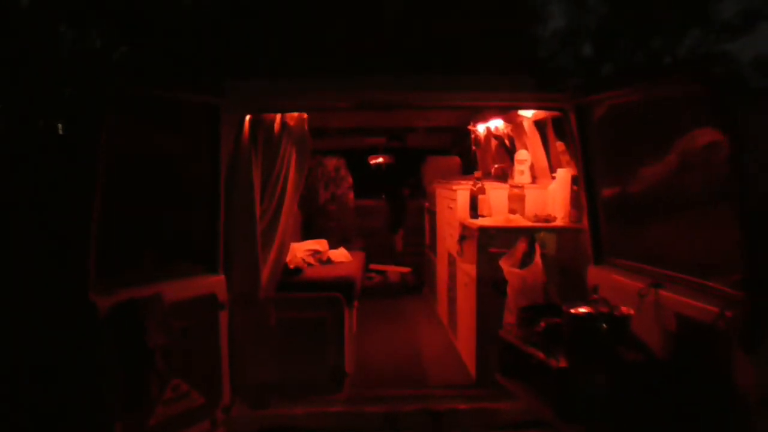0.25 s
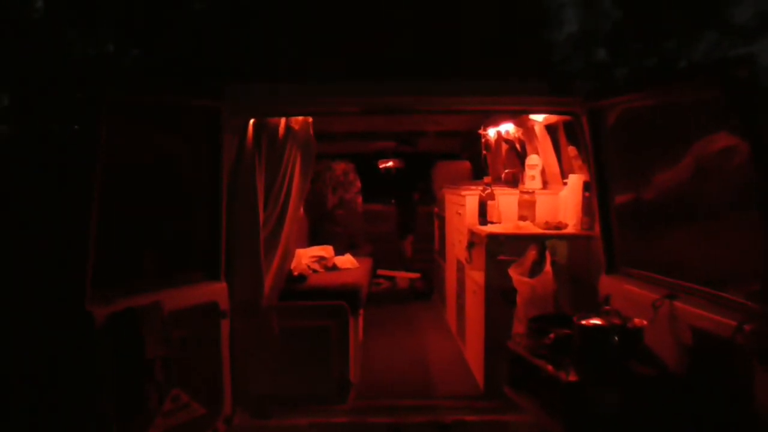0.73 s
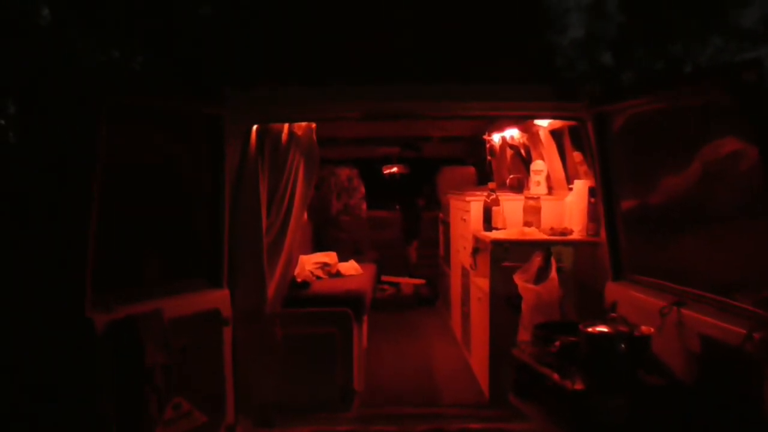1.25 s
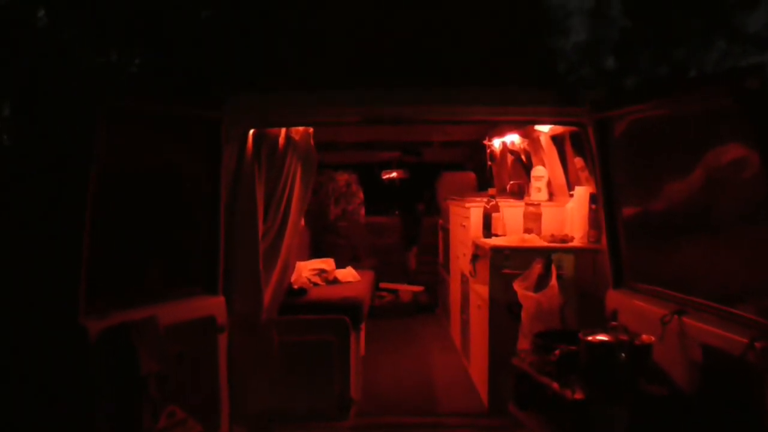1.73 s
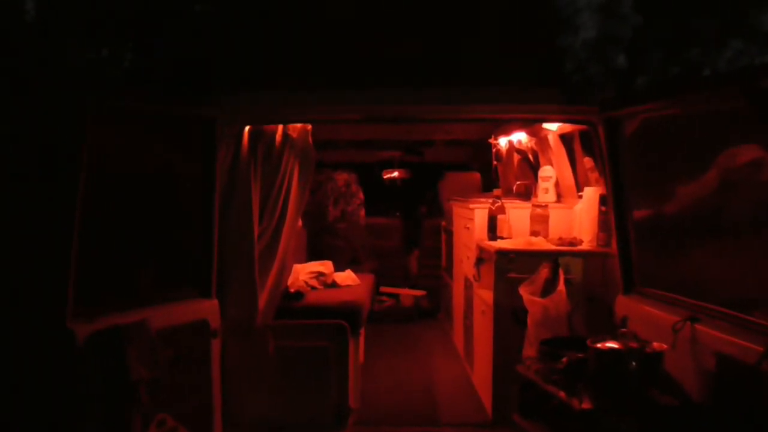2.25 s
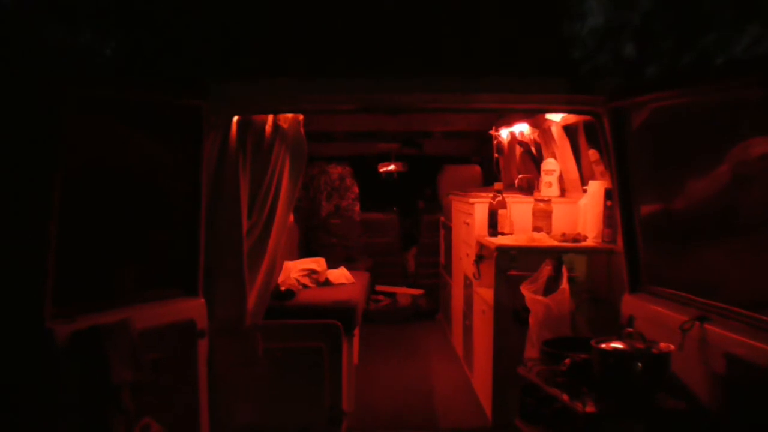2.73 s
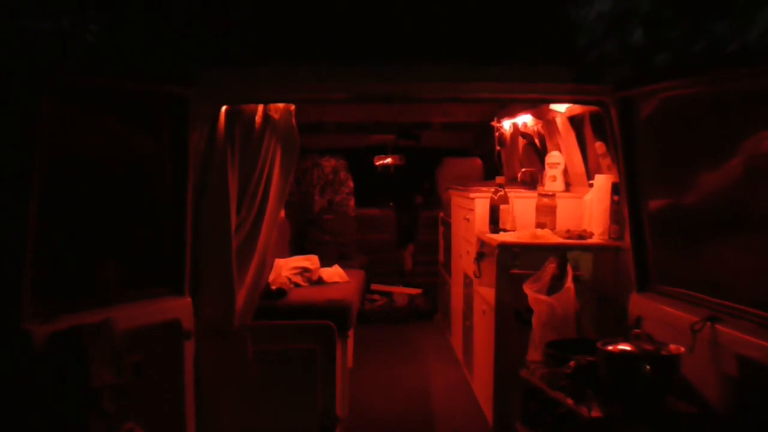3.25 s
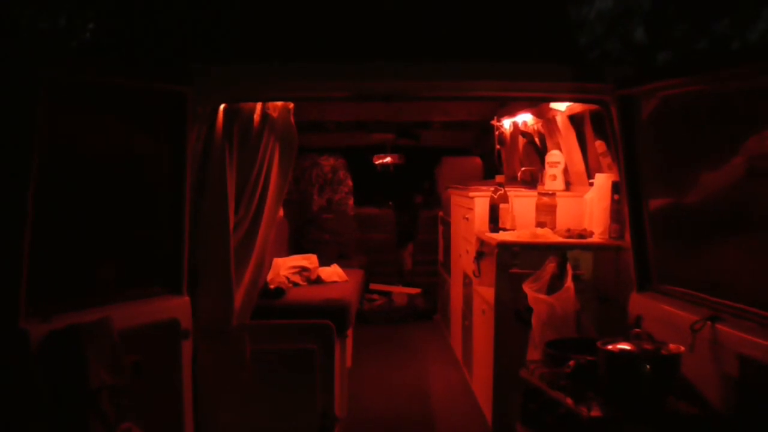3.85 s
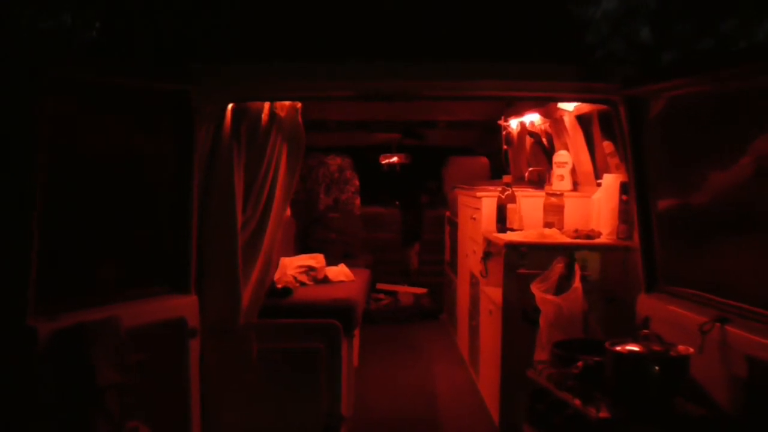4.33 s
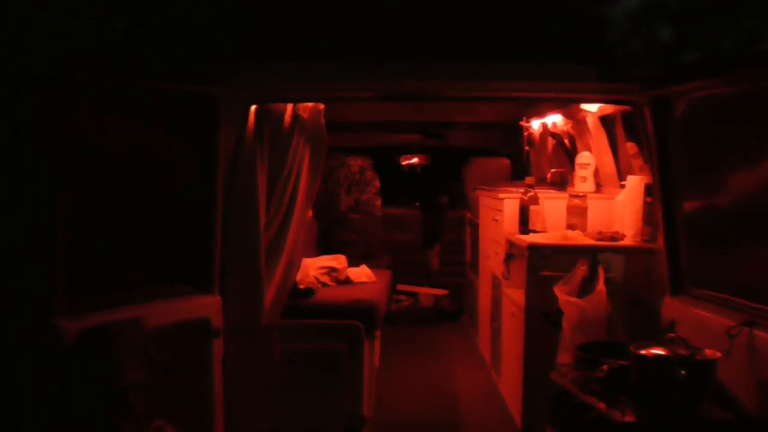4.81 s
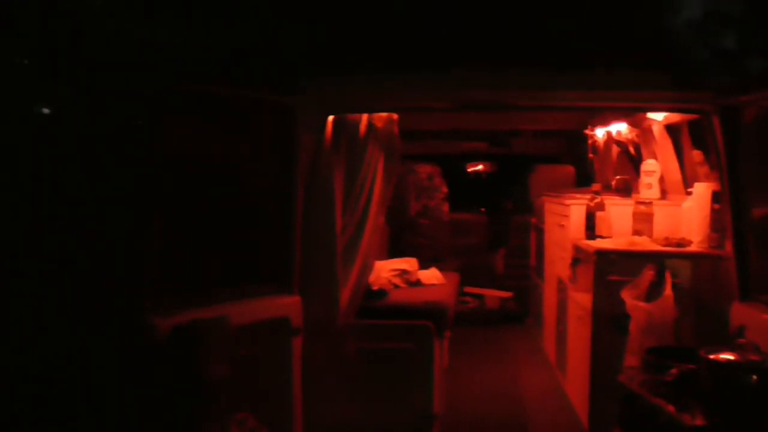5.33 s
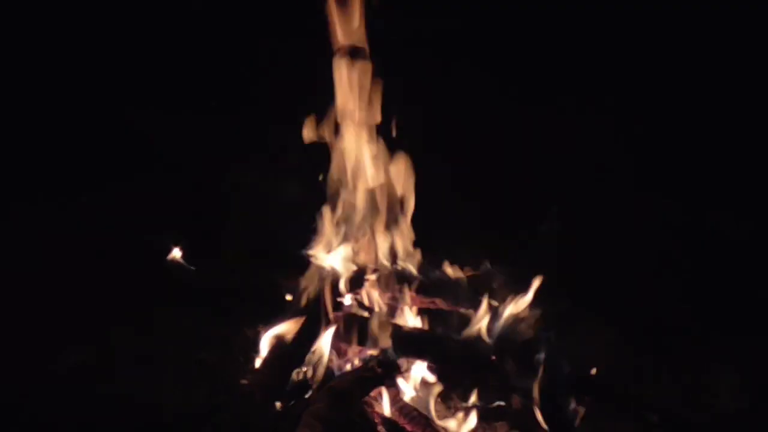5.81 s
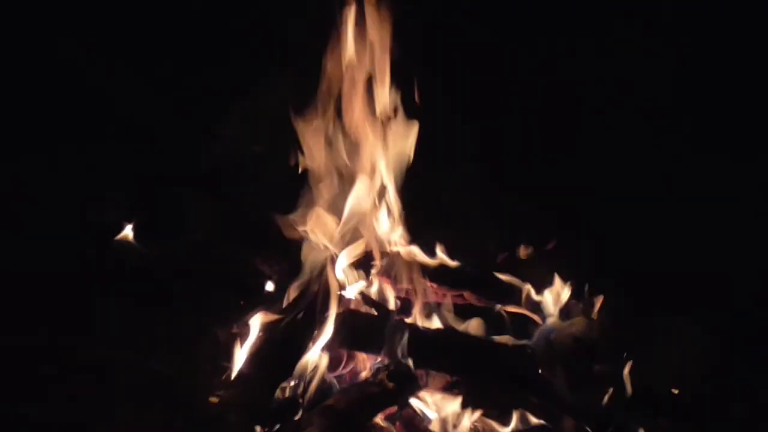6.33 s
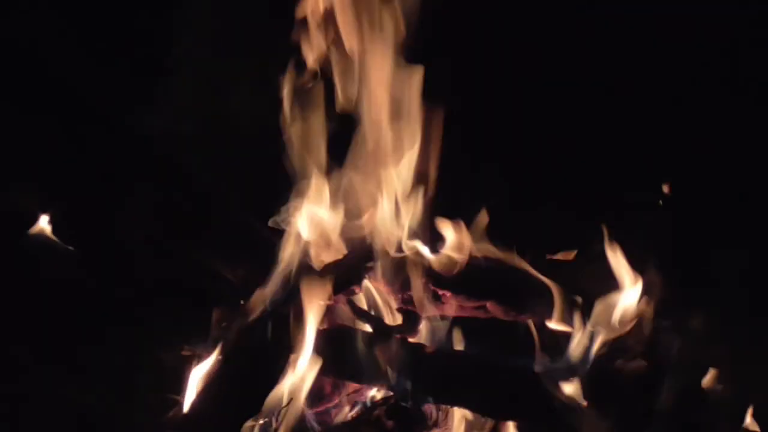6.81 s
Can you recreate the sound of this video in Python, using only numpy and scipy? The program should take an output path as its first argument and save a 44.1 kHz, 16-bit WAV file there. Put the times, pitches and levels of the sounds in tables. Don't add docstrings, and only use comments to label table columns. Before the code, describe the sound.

A stereo microphone at a night pond catches two near frogs, slightly left: one warbling in quick round pitch arches, increasingly tired, the other answering with lower, short pulsed croaks. Far quacks, soft frog notes, thin cricket bursts and tiny peeps surround them, with woodland echo. Then a hard change to a small fire nearby: low fluttering rush, fine ember crackle, bright snaps, and faint quacks and insects behind.

```python
import sys
import numpy as np
from scipy import signal
from scipy.fft import next_fast_len
from scipy.io import wavfile
from scipy.ndimage import uniform_filter1d

SR = 44100
rng = np.random.default_rng(int(sys.argv[2]) if len(sys.argv) > 2 else 0)


def convert_level_to_amplitude(level_db):
    exponent = np.asarray(level_db, float) / 20
    return 10 ** exponent


def store_wav(level_fs):
    pcm = np.round(np.clip(np.atleast_2d(level_fs), -1, 1) * 32767)
    wavfile.write(sys.argv[1], SR, pcm.T.astype(np.int16))


N = 311787
SCENE_CHANGE_S = 5.521

# start [t/s], tiredness [0-1]
WARBLES = [
    (.666, 0.02),
    (1.798, 0.4),
    (2.927, 0.71),
    (4.045, .6),
    (5.158, 0.97),
]
ARCH_TOPS = [
    [.670, .733, .796, .862, .921, .971],
    [1.822, 1.886, 1.953, 2.018, 2.078, 2.13],
    [2.951, 3.014, 3.085, 3.15, 3.211, 3.269],
    [4.065, 4.131, 4.201, 4.268, 4.328, 4.381],
    [5.182, 5.246, 5.313, 5.38, 5.438, 5.499],
]
ARCH_HZ = [
    [1422, 1610, 1620, 1580, 1450, 1284],
    [1450, 1400, 1545, 1470, 1500, 1265],
    [1420, 1470, 1450, 1400, 1375, 1300],
    [1400, 1440, 1420, 1435, 1345, 1280],
    [1400, 1395, 1375, 1330, 1290, 1265],
]
ARCH_DB = [
    [-0.15, -1.5, -1.1, -1, 0.95, -1.4],
    [0.39, -0.24, -1.1, 0.85, 0.58, -1.4],
    [0.23, 0.12, 1.7, 2.3, .5, 0.61],
    [-1.9, 0.4, -1.3, 1, 0.59, 0.2],
    [0.9, 2.1, -1, 0.91, 0.95, 1],
]
# [f/Hz], [level/dB]
WARBLE_SAC = [(800, -24), (1080, -7.5), (1300, -10.5), (1600, -8), (2300, -30), (2750, -31), (3100, -23),
              (3600, -25.5), (4200, -36), (5200, -32.5), (6000, -41), (7000, -53)]
# [f/Hz], width [f/Hz], [level/dB]
WARBLE_RING = [(1262.4, 186, 9.1), (2698, 270, 12.8)]
# [f/Hz], width [f/Hz], [level/dB]
SAC_HISS = [(3600, 1100, -31), (5200, 500, -37), (5920, 270, -39)]
# first top [t/s], effort [level/dB], top [f/Hz], length of an arch [t/s], arches [count]
CROAKS = [(1.359, -41.5, 1170, .0235, 4.2), (1.684, -41, 1170, 0.022, 4.6), (2.020, -42.5, 1190, .023, 6.5),
          (2.331, -41, 1220, 0.027, 4.2), (2.656, -41.5, 1210, .0235, 4.6), (2.995, -41.5, 1170, .024, 5),
          (3.323, -38.5, 1210, 0.023, 3.6), (3.645, -41.5, 1180, 0.021, 5.6),
          (3.998, -42.5, 1130, 0.027, 4.6), (4.332, -39, 1220, 0.019, 4.6), (4.652, -42, 1220, 0.031, 4.6),
          (5.002, -43, 1160, 0.023, 5.5), (5.331, -38.5, 1240, 0.022, 4.4), (3.866, -47.5, 1250, 0.02, 5.9),
          (4.771, -48.5, 1230, 0.024, 11), (2.892, -48.5, 915, .024, 1.6), (1.3, -40, 1900, 0.017, 0.68)]
CROAK_DEPTHS = [0.17, .8, 0.795, 0.94, 0.93, 0.797, 0.13, 0.97, 0.808, 0.23, 1.0, .25, 0.452, 0.766, 0.772,
                0.85, 0.57]
# [f/Hz], [level/dB]
CROAK_SAC = [(650, -8.5), (850, -4), (1050, -1.5), (1200, -5), (1500, -25.5), (2000, -32), (2400, -30.5),
             (2800, -24), (3600, -31.5), (5000, -38)]
# [f/Hz], width [f/Hz], [level/dB]
CROAK_RING = [(1189, 230, 3.1), (2410, 266, 13.2)]
# start [t/s], length [t/s], [level/dB], start of upper band [f/Hz], lower band [f/Hz]
QUACKS = [(.001, 0.075, -49, 1963, 910), (0.139, 0.071, -52, 1463, 898), (0.366, 0.12, -52, 2000, 860),
          (0.48, 0.049, -57, 1276, 836), (1.035, 0.098, -49, 1480, 854), (2.187, 0.068, -57, 1400, 1100),
          (2.534, 0.095, -50, 1460, 994), (5.721, 0.12, -64, 1290, 973), (5.81, 0.11, -50, 1930, 880),
          (6.069, 0.071, -56, 1343, 930), (6.316, 0.085, -53, 1340, 830), (6.468, 0.11, -48.5, 1970, 910),
          (6.838, 0.044, -61, 1320, 990), (7.025, 0.049, -62, 1150, 796)]
# start [t/s], length [t/s], [level/dB], start of gliding band [f/Hz], other band [f/Hz]
HIGH_QUACKS = [
    (0.819, 0.12, -56.5, 2200, 5900),
    (1.195, 0.068, -52.5, 3000, 6000),
    (1.582, 0.068, -58, 2400, 1900),
    (1.003, 0.075, -50.5, 2200, 1100),
]
# start [t/s], length [t/s], [level/dB], from [f/Hz], to [f/Hz]
FROG_NOTES = [(.001, .045, -54.5, 1056, 810), (.005, 0.058, -54.5, 1900, 1830),
              (.025, 0.059, -55, 1517, 1396), (0.13, 0.027, -56, 1200, 1550),
              (0.173, 0.037, -51, 1400, 1300), (0.153, 0.036, -57, 1004, 900),
              (0.368, 0.049, -52, 2010, 1843), (0.396, 0.029, -49, 1565, 1550),
              (0.416, 0.033, -52, 1600, 1450), (0.451, 0.026, -50, 1400, 1140),
              (0.373, 0.023, -52, 990, 945), (.395, 0.062, -52, 845, 770), (.485, 0.021, -53, 1180, 1400),
              (0.514, 0.024, -53, 1520, 1295), (.495, 0.033, -52.5, 804, 835),
              (1.043, 0.025, -47, 1580, 1280), (1.067, 0.017, -42, 1637, 1250),
              (1.04, .03, -52.5, 886, 806), (1.071, .04, -54, 962, 800), (1.253, 0.023, -39.5, 1216, 1330),
              (1.271, 0.023, -43, 1210, 950), (2.186, .025, -44, 1250, 1640), (2.2, 0.017, -59, 1450, 1150),
              (2.241, 0.038, -47.5, 1400, 1386), (2.199, .06, -59, 1957, 1950),
              (2.218, 0.016, -57, 2250, 2240), (2.535, 0.029, -48, 1520, 1450),
              (2.583, 0.024, -51, 1306, 1150),
              (3.3, 0.02, -59, 1200, 1500), (5.765, 0.038, -54, 1450, 1300), (5.74, 0.043, -55, 950, 970),
               (5.81, 0.043, -51.5, 2010, 1800), (9.5, .018, -57, 1400, 1590), (4.9, .04, -57.5, 1300, 1450),
               (5.82, 0.082, -47, 710, 880), (9.4, .022, -58, 1100, 1100), (6.12, .035, -57.5, 1400, 1800),
               (6.092, 0.039, -52, 940, 990), (6.318, 0.028, -71, 1300, 1400), (8.8, .03, -49, 1200, 1500),
               (6.475, 0.042, -50, 2010, 1800), (6.475, 0.021, -50, 1610, 1590),
               (6.5, 0.032, -63, 1200, 1200), (5.9, .03, -55, 1700, 1400), (6.48, 0.066, -55, 780, 990),
               (6.845, 0.037, -54.5, 1300, 1380), (7.025, 0.045, -59, 1250, 1500)]
# start [t/s], end [t/s], [level/dB], first wing tone [f/Hz], fade over the series [level/dB]
CRICKET = [
    (-.15, 0.703, -53, 7950, 4.5),
    (1.124, 1.905, -58.5, 7810, 1),
    (2.221, 3.155, -59.5, 7800, -0.2),
    (3.517, 4.41, -59, 7850, 1.1),
    (4.701, 5.536, -60.5, 7800, 0.2),
    (5.556, 6.297, -61.5, 7420, 9.5),
    (6.898, 7.3, -60, 7930, 1),
    (5.618, 6.45, -63, 7950, 7),
]
STROKE_PHASE = [.27, .92, .53, .5, .67, .2, .4, .7]
# start [t/s], length [t/s], [level/dB], [f/Hz]
PEEPERS = [(0.33, 0.033, -62, 4450), (0.731, 0.047, -58, 4470), (0.802, 0.17, -53, 4490),
           (1.187, 0.11, -56.5, 4500), (1.623, 0.025, -57, 4300), (2.115, 0.18, -55, 4480),
           (2.355, 0.075, -57, 4500), (2.523, 0.037, -60.5, 4570), (3.024, 0.047, -61, 4530),
           (3.264, 0.032, -56.5, 4540), (3.341, 0.059, -60.5, 4390), (3.604, 0.053, -57.5, 4470),
           (3.894, 0.028, -56, 4670), (3.98, 0.041, -60, 4390), (4.091, 0.032, -59, 4640),
           (4.423, 0.035, -55, 4470), (4.977, 0.058, -57, 4460), (5.105, 0.041, -59.5, 4590),
           (5.354, 0.1, -58.5, 4470), (6.644, 0.03, -59, 4570)]
# start [t/s], length [t/s], [level/dB], [f/Hz]
LONE_PEEPS = [(.03, .04, -66.5, 4630), (1.095, 0.034, -58.5, 4460), (4.608, .032, -60, 4390),
              (5.72, .04, -61.5, 4620), (6.411, .03, -62, 4420), (6.788, 0.032, -59.5, 4320),
              (6.847, .03, -61, 4210), (3.165, .03, -63, 4730), (3.23, .03, -73, 4630),
              (3.395, .035, -62, 4190), (3.464, 0.029, -63.5, 4310), (3.52, .03, -69, 4540),
              (2.09, 0.032, -60, 4760)]
# [t/s], peak [level/dB], crack [f/Hz], low part [level/dB], left over right [level/dB]
SNAPS = [(0.2484, -34.5, 8090, -38, 0), (0.997, -44.5, 8600, -48, 3.5), (3.3735, -39.5, 8750, -40, 6),
         (5.5569, -56, 10680, -70, -1.0), (5.5755, -36.5, 10700, -58, -5), (5.6164, -51.5, 8000, -57, -1.0),
         (5.8346, -60, 9000, -70, -2), (7.0235, -50, 8200, -68, -2), (5.8541, -55, 8160, -66.5, -5),
         (5.9883, -45.5, 9600, -58, -1.0), (6.1479, -51, 9100, -63, -3.5), (6.3944, -60, 8730, -69, -7),
         (6.8987, -56, 11000, -67, -1.0), (7.012, -49, 11400, -59, -1.5)]
# [t/s], [level/dB], [f/Hz], time to fall 60 dB [t/s]
KNOCK = (4.504, -48, 370, .05)
# start, attack, hold, release [t/s]
RUSTLE = (0.207, 0.014, 0.044, 0.016)
# [f/Hz], density [level/dB]
RUSTLE_COLOUR = [(120, -16), (300, 4.5), (1300, -3.5), (4500, -3.5), (9000, -6), (13000, -9), (15500, -30),
                 (15900, -50)]
# [f/Hz], density [level/dB]
FIRE_COLOUR = [(15, -49), (25, -32), (145, 2), (451, -9.5), (936, -9), (1160, -12.5), (1440, -8.5),
               (1740, -18.5), (2760, -28.5), (4490, -16), (5570, -28), (7920, -21), (11900, -25.5),
               (15400, -31.5), (16000, -50)]
# [f/Hz], density [level/dB]
POND_COLOUR = [(25, -25), (50, -19.5), (150, -3.5), (340, -8.5), (600, -16.5), (850, -7.5), (1400, -11),
               (1750, -24.5), (3250, -26.5), (4450, -15), (5700, -31.5), (8100, -17), (10500, -27.5),
               (15550, -31.5), (15900, -62)]
# [f/Hz], correlation [-1 to 1]
SAME = [(30, 0.28), (130, 0.86), (300, 0.02), (1000, 0.061), (3000, 0.025), (12000, 0.033)]
# [t/s], [level/dB]
CHORUS = [
    (.66, -84),
    (.9, -61),
    (1.6, -57),
    (2.8, -60),
    (3.5, -61.5),
    (4.5, -60.5),
    (5.53, -55),
]
# [f/Hz], width [f/Hz], [level/dB]
DRONE = (8770, 590, -72)
# [f/Hz], [level/dB]
HUM = (50, -84)
# [f/Hz], time to fall 60 dB [t/s]
WOODS = [(500, 2.7), (1200, 0.67), (2500, 2.1), (5000, 0.76), (9000, 0.055)]


def evened(x):
    return x / np.sqrt(np.mean(x ** 2) + 1e-20)


def drifting(n, size):
    return evened(uniform_filter1d(rng.standard_normal(n), size=size))


def read(points, hz):
    f, value = np.transpose(points)
    return np.interp(np.log(hz + 1), np.log(f + 1), value)


def sine(hz):
    return np.sin(2 * np.pi * np.cumsum(hz) / SR)


def resonate(x, hz, width):
    turn = np.exp(2j * np.pi * np.cumsum(hz * np.ones(len(x))) / SR)
    r = np.exp(-np.pi * width / SR)
    return 2 * (turn * signal.lfilter([1 - r], [1, -r], x / turn + 1e-18)).real


def ring(x, hz, width, width2=None):
    return resonate(resonate(x, hz, width), hz, width2 or width)


def add(mix, s, sound):
    part = mix[max(round(s * SR), 0):][:len(sound)]
    part += sound[:len(part)]


def placed(x, left_db, lag=2):
    return np.array([convert_level_to_amplitude(left_db / 2) * x, convert_level_to_amplitude(-left_db / 2) * np.roll(x, lag)])


def turned(x, left_db):
    late = (signal.hilbert(x, next_fast_len(N))[:N] * np.exp(-1j)).real
    return np.array([convert_level_to_amplitude(left_db / 2) * x, convert_level_to_amplitude(-left_db / 2) * late])


def noise(colour, patchy_db, size=1024):
    hz = np.fft.rfftfreq(size, 1 / SR)
    a, b, c, d, patches = rng.standard_normal((4 * N // size + 5, len(hz), 5)).T
    patches = uniform_filter1d(patches, size=12, axis=0)
    patches = evened(uniform_filter1d(patches, size=12, axis=1))
    same = np.clip(read(SAME, hz), -1, 1)[:, None]
    left = a + 1j * b
    z = np.array([left, same * left + np.sqrt(1 - same ** 2) * (c + 1j * d)])
    z = z * convert_level_to_amplitude(read(colour, hz)[:, None] + patchy_db * patches)
    return evened(signal.istft(z, nperseg=size, noverlap=3 * size // 4)[1][:, :N])


def whistle(hz, under, sac, sac_ring, wobble, hoarse):
    n = len(hz)
    hz = hz * (1 + wobble * drifting(n, 160))
    flutter = drifting(n, 160)
    rasp = evened(flutter + 1.24 * drifting(n, 40))
    turns = 2 * np.pi * (np.cumsum(hz) / SR + rng.random())
    overtones = sum(convert_level_to_amplitude(read(sac, k * hz)) * np.sin(k * turns) for k in range(2, 6))
    tone = convert_level_to_amplitude(read(sac, hz)) * np.sin(turns) + overtones * (1 - hoarse + hoarse * rasp)
    rung = sum(convert_level_to_amplitude(db) * ring(tone, f, width) for f, width, db in sac_ring)
    return tone + rung + under * (1 + 0.47 * flutter) * np.sin(.76 * turns)


def warble(start, tired, s, top_hz, extra_db):
    arches, dip_hz = len(s), 1074
    spent = np.linspace(0, 1, arches)
    breath = np.sin(np.pi * np.arange(1, arches + 1) / arches)
    breath[0] *= 1 - 0.619 * (1 - tired) ** 1.49

    rise_hz = top_hz[-1] - 25 - 140 * tired - dip_hz
    swing_hz = np.array(top_hz) - dip_hz - rise_hz * spent ** 3.165
    soft_start_db = 5.5 * (0.52 + 0.92 * tired) * (1 - spent) ** 8
    fade_db = (3.5 + 10.5 * tired) * spent ** (2.8 - 1.6 * tired)
    effort_db = np.array(extra_db) - 31 + 0.41 * tired - soft_start_db - fade_db

    t = np.arange(start, s[-1] + .031 * (1 + .6 * tired), 1 / SR)
    arch = np.interp(t, [s[0] - .064, *s, s[-1] + 0.0643], np.arange(arches + 2))
    dip = abs(np.sin(np.pi * arch))
    flat_top = 3.3 - 1.2 * tired ** .5
    hz = np.interp(t, s, top_hz) - np.interp(t, s, swing_hz) * dip ** flat_top

    push_db = 2 * tired ** .5 * np.sin(2 * np.pi * arch)
    gulp_db = dip ** 6 * (arch < arches - .9)
    level = convert_level_to_amplitude(np.interp(t, s, effort_db) + push_db - gulp_db) * signal.windows.tukey(len(t), .03)

    air = rng.standard_normal(len(t))
    hiss = sum(convert_level_to_amplitude(db) * evened(ring(air, f, width)) for f, width, db in SAC_HISS)
    hiss = hiss * np.interp(t, s, breath) * min(0.6 + 2 * tired, 1)
    under = convert_level_to_amplitude(-21 + 6 * tired) * dip ** 6
    return t[0], level * (hiss + whistle(hz, under, WARBLE_SAC, WARBLE_RING, wobble=.006, hoarse=.6))


def croak(s, effort_db, top_hz, arch_s, arches, depth):
    sink = .19 if arches < 5.8 else .08
    arch = np.arange(-.5, arches - .5, 1 / (SR * arch_s))
    tiring = np.clip(arch / arches, 0, 1)
    dip = abs(np.sin(np.pi * arch))
    dip = dip * np.clip(depth + (1 - depth) * 2.23 * tiring, 0, 1) ** 0.302

    soft_start_db = 2.4 * np.exp(-((arch + .3) / 0.21) ** 2)
    swell_db = 4 - 100 * sink * (tiring - .3) ** 2
    level_db = effort_db - soft_start_db + swell_db - 15 * sink * dip ** 8
    hz = top_hz * (1 - sink * tiring ** 1.5) - 90 * dip ** 2 - sink * (500 + 1100 * tiring) * dip ** 7

    voice = whistle(hz, convert_level_to_amplitude(-17) * (.3 + tiring), CROAK_SAC, CROAK_RING, wobble=.015, hoarse=.7)
    return s - arch_s / 2, convert_level_to_amplitude(level_db) * signal.windows.tukey(len(arch), .14) * voice


def quack(s, length, db, from_hz, low_hz, to_hz, clear):
    t = np.arange(0, length, 1 / SR)
    u = t / length
    air = rng.standard_normal(len(t))
    puff = np.sin(np.pi * 41 * t) ** 2
    arch = 1 - .09 * (1 - puff) ** 1.484
    step = 1 + np.exp((u - .36) / 0.072)
    glide = arch * (1.1 * to_hz - 130 * u + (from_hz - 1.07 * to_hz) / step)

    upper = evened(ring_pair(air, glide, 220, glide, 250)) + clear * 1.4 * sine(glide)
    held = evened(ring_pair(air, from_hz * arch, 230, from_hz * arch, 300))
    upper = upper + 0.94 * held * (1 - 0.29 * u)
    lower = evened(ring_pair(air, low_hz, 210, low_hz, 260))
    low_turns = low_hz * np.cumsum(arch * (1.12 - 0.173 * u)) / SR
    lower = lower + clear * 2.0 * np.sin(2 * np.pi * low_turns)
    haze = evened(ring_pair(air, 3140, 1200, 3260, 1300))

    voice = upper + 0.71 * min(1, 1300 / low_hz) ** 2.6 * lower + 0.32 * haze
    return s, convert_level_to_amplitude(db - 9 + 4.5 * clear) * (.35 + puff) * voice * signal.windows.tukey(len(t), .6)


def ring_pair(x, hz, width, hz2, width2):
    return resonate(resonate(x, hz, width), hz2, width2)


def note(s, length, db, from_hz, to_hz):
    u = np.linspace(0, 1, round(length * SR))
    bow = np.sin(np.pi * u)
    wander, flutter = drifting(4000, 200)[:len(u)], drifting(4000, 200)[:len(u)]
    hz = (from_hz + (to_hz - from_hz) * u) * (1 + 0.025 * bow + 0.016 * wander)
    return s, convert_level_to_amplitude(db) * bow * (1 + 0.57 * flutter) * sine(hz)


def cricket(start, end, db, first_hz, fade_db, phase, strokes_per_s=57.6):
    t = np.arange(max(start, 0), min(end, N / SR), 1 / SR)
    age = t - start
    spent = age / (end - start)
    swell_db, stop_db = 13.5 * np.exp(-age / 0.07), 20 * np.exp((t - end) / 0.015)
    level_db = db - swell_db - fade_db * spent - stop_db

    u = (t * strokes_per_s - phase + .5) % 1 - .5
    stroke = np.exp(-(u / 0.28) ** 2) + 0.45 * np.exp(-((u - .36) / 0.053) ** 2)
    warm_hz = 1600 * age / (1 + (fade_db / 6.1) ** 2)
    wing_hz = np.minimum(first_hz + warm_hz, 8028) + 37.7 * drifting(len(t), 900)
    hz = wing_hz + 80 - 1600 * np.clip(u + .05, 0, .45) ** 1.6
    rasp = 1 + 0.36 * drifting(len(t), 50)
    return t[0], convert_level_to_amplitude(level_db) * evened(stroke * rasp * sine(hz))


def peepers(count=1400, spread_db=2.2, spread_hz=600):
    clock = np.arange(0, N + 64, 64) / SR
    out = np.zeros((2, N))
    crowd = convert_level_to_amplitude(np.where(clock < SCENE_CHANGE_S, -67, -67.5)) ** 2
    power, pull = crowd, crowd * 4480
    for s, length, db, hz in PEEPERS + LONE_PEEPS:
        outside = np.maximum(abs(clock - s - length / 2) - length / 4, 0)
        swell = convert_level_to_amplitude(db - 3.5) ** 2 * np.exp(-(outside / 0.029) ** 2)
        power, pull = power + swell, pull + swell * hz
    centre_hz = pull / power

    for when, pitch, length, size, side in rng.random((count, 5)):
        s = when * N / SR
        t = np.arange(0, 0.0082 + 0.027 * length, 1 / SR)
        start_hz = np.interp(s, clock, centre_hz) + spread_hz * (pitch - .4)
        peep = np.sin(2 * np.pi * (start_hz * t - 3000 * t ** 2)) * np.hanning(len(t))
        peep = peep * convert_level_to_amplitude(-spread_db * np.log(size))
        add(out[0], s, peep * side ** .5)
        add(out[1], s, peep * (1 - side) ** .5)
    steady = out / np.sqrt(uniform_filter1d((out ** 2).mean(0), size=5000) + 0.18)
    steady = steady * np.interp(np.arange(N) / SR, clock, np.sqrt(power))

    lead_s, fall_hz = 0.047, 470
    t = np.arange(0, lead_s, 1 / SR)
    for s, length, db, hz in PEEPERS + LONE_PEEPS:
        turns = (hz + fall_hz / 2) * t - fall_hz * t ** 2 / lead_s / 2
        lead = convert_level_to_amplitude(db + 0.5) * np.sin(2 * np.pi * turns) * np.hanning(len(t))
        add(steady.T, s + length / 2 - lead_s / 2, placed(lead, 9.5).T)
    return steady


def fire_roar():
    return convert_level_to_amplitude(-56) * noise(FIRE_COLOUR, patchy_db=1.24) * convert_level_to_amplitude([[-1], [1]])


def embers(per_s=45, db=-58, spread_db=3.0):
    size = convert_level_to_amplitude(spread_db * np.minimum(rng.exponential(1, N), 3)) * (rng.random(N) < per_s / SR)
    ticks = 6 * ring_pair(size, 2050, 1300, 2200, 1300) + .8 * resonate(size, 10530, 5000)
    return convert_level_to_amplitude(db) * placed(ticks, -2, lag=-1)


def snaps():
    out, t = np.zeros((2, N)), np.arange(400) / SR
    for s, db, hz, low_db, left_db in SNAPS:
        burst = rng.standard_normal(len(t))
        bright = resonate(ring(burst, hz, 4300, 4900), 0.67 * hz, 9100)
        bright = evened(bright) * convert_level_to_amplitude(db - 1.0 - 60 * t / 0.0077)
        dull = evened(resonate(burst, 1650, 2200)) * convert_level_to_amplitude(low_db - 60 * t / 0.0069)
        add(out.T, s + 0.001195, placed(bright + dull, left_db, lag=0).T)
    return out


def knock():
    out = np.zeros((2, N))
    s, db, hz, t60 = KNOCK
    t = np.arange(0, .1, 1 / SR)
    body = evened(ring(rng.standard_normal(len(t)), hz, 350, 450))
    add(out.T, s, placed(convert_level_to_amplitude(db - 60 * t / t60) * body, 3.9).T)
    return out


def rustle():
    s, attack, hold, release = RUSTLE
    age = np.arange(N) / SR - s
    fall = np.exp(-3 * np.maximum(age - attack - hold, 0) / release)
    shape = np.clip(age / attack, 0, 1) * fall
    grain = 1 + 1.1 * (rng.random(N) < .01)
    return noise(RUSTLE_COLOUR, patchy_db=2.5, size=256) * grain * shape * convert_level_to_amplitude(-46)


def chorus(hz=1140, width=220, throb_per_s=42):
    t = np.arange(N) / SR
    s, db = np.transpose(CHORUS)
    throb = 1 + .5 * np.sin(2 * np.pi * throb_per_s * t + 2.94 * drifting(N, 4000))
    return convert_level_to_amplitude(np.interp(t, s, db)) * throb * evened(ring(rng.standard_normal(N), hz, width))


def woods(x):
    taps = np.zeros((2, 2 * SR))
    at = np.arange(500, 2 * SR - 20, 20) + rng.integers(0, 20, (2, (2 * SR - 501) // 20))
    np.put_along_axis(taps, at, rng.choice([-1., 1.], at.shape), 1)
    hz, t, z = signal.stft(taps, SR, nperseg=256)
    tail = signal.istft(z * convert_level_to_amplitude(-60 * t / read(WOODS, hz)[:, None]), SR, nperseg=256)[1]
    tail = tail + .5 * tail[::-1]
    return signal.fftconvolve(x[None], tail / np.linalg.norm(tail[0]), axes=1)[:, :N]


def pond_air():
    return convert_level_to_amplitude(-57.5) * noise(POND_COLOUR, patchy_db=2.5)


def drone():
    hz, width, db = DRONE
    hum_hz, hum_db = HUM
    hiss = np.array([evened(ring(air, hz, width)) for air in rng.standard_normal((2, N))])
    hum = convert_level_to_amplitude(hum_db) * np.sin(2 * np.pi * hum_hz * np.arange(N) / SR)
    return convert_level_to_amplitude(db + 3.2 * drifting(N, 3000)) * hiss + hum


def scene():
    warbler, croaker, far, wings = np.zeros((4, N))
    for row, *arches in zip(WARBLES, ARCH_TOPS, ARCH_HZ, ARCH_DB):
        add(warbler, *warble(*row, *arches))
    for row, depth in zip(CROAKS, CROAK_DEPTHS):
        add(croaker, *croak(*row, depth))
    for row in QUACKS:
        add(far, *quack(*row, to_hz=1384, clear=0))
    for row in HIGH_QUACKS:
        add(far, *quack(*row, to_hz=2060, clear=1))
    for row in FROG_NOTES:
        add(far, *note(*row))
    for row, phase in zip(CRICKET, STROKE_PHASE):
        add(wings, *cricket(*row, phase))

    by_fire = np.clip((np.arange(N) / SR - SCENE_CHANGE_S) / 0.0052, 0, 1)
    near = turned(warbler, 5.9) + turned(croaker, 7.0) + turned(chorus(), 5.9)
    near = near + woods(warbler + croaker) * convert_level_to_amplitude([[-10], [-13.5]])
    pond = near + pond_air()
    fire = fire_roar() + embers()
    calls = turned(far, 2.5) + convert_level_to_amplitude(-16) * woods(far)
    insects = placed(wings, 5.3, lag=1) * (1 - 0.57 * by_fire) + convert_level_to_amplitude(-3.0) * woods(wings)
    insects = insects + peepers() + drone()
    return pond * (1 - by_fire) + fire * by_fire + insects + calls + snaps() + knock() + rustle()


def low_pass(x):
    return signal.sosfilt(signal.butter(12, 16520, fs=SR, output="sos"), x)


def record(dry):
    def limited(edge_hz):
        lowpass = signal.firwin(511, edge_hz, window=("kaiser", 9), fs=SR)
        return signal.oaconvolve(dry, lowpass[None], "same")

    mix = np.where(np.arange(N) < SCENE_CHANGE_S * SR, limited(15750), limited(16500))
    return low_pass(mix)


dry = scene()
out = record(dry)
store_wav(out)
```